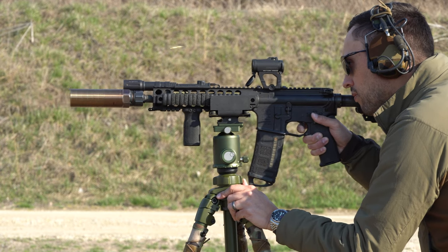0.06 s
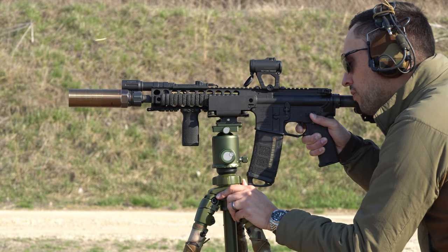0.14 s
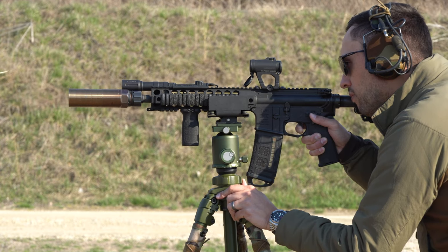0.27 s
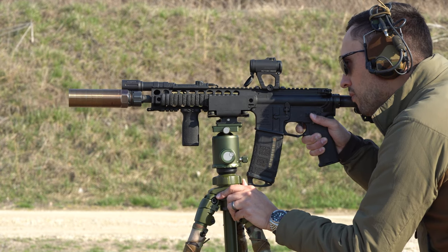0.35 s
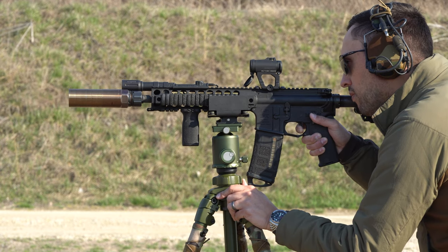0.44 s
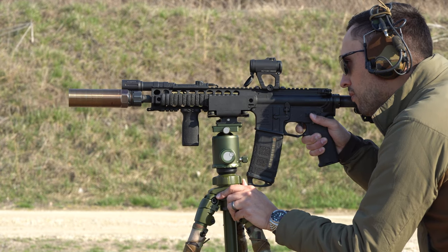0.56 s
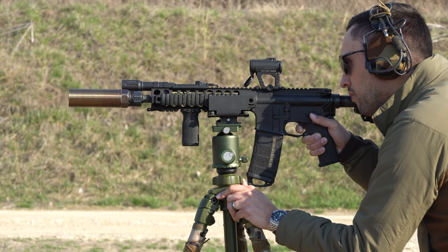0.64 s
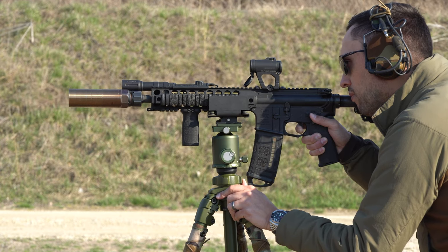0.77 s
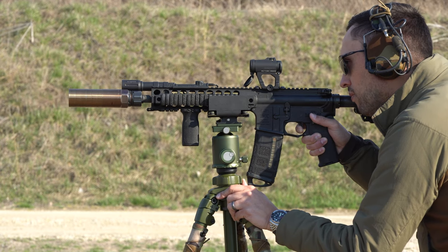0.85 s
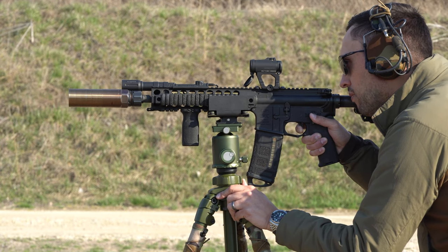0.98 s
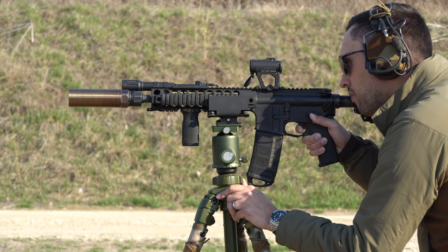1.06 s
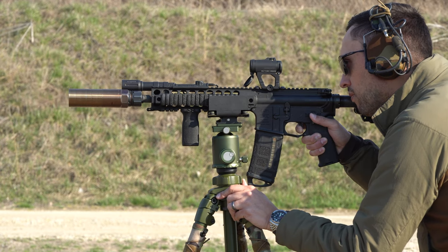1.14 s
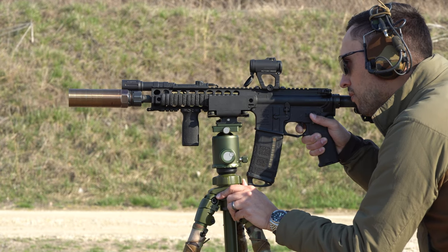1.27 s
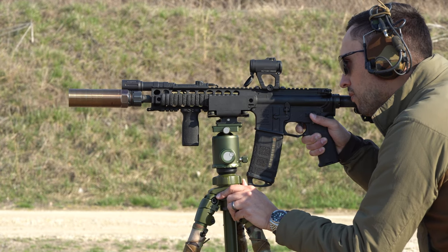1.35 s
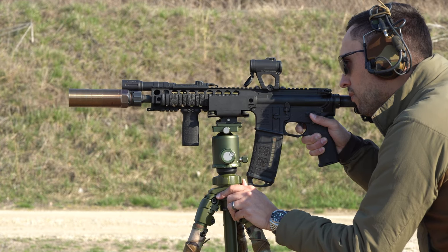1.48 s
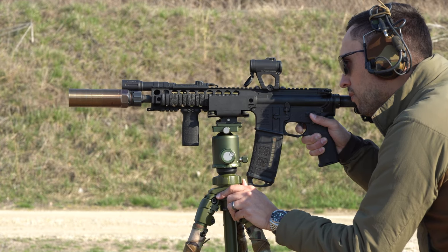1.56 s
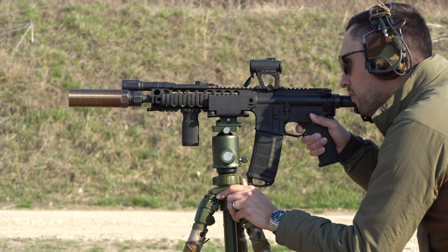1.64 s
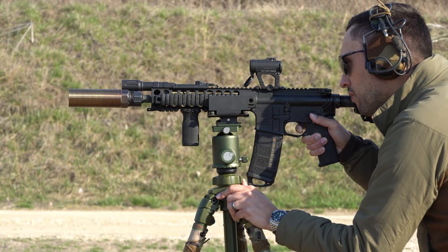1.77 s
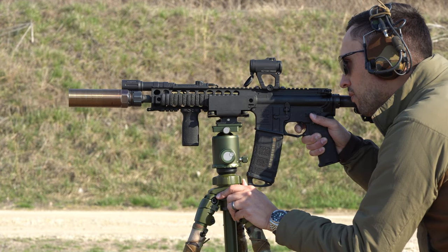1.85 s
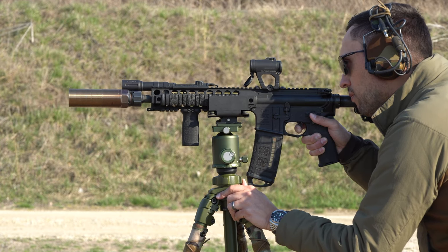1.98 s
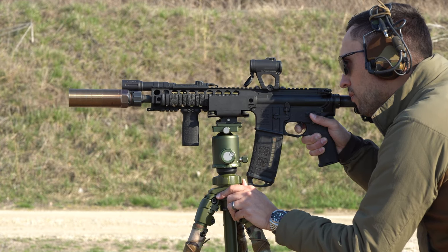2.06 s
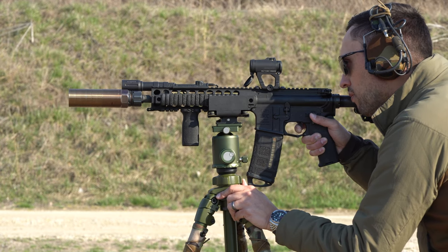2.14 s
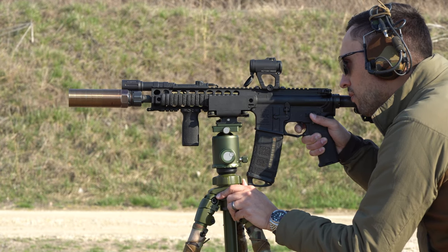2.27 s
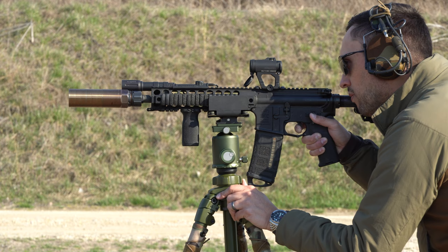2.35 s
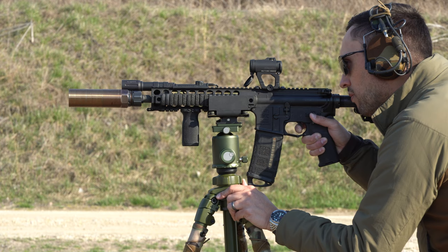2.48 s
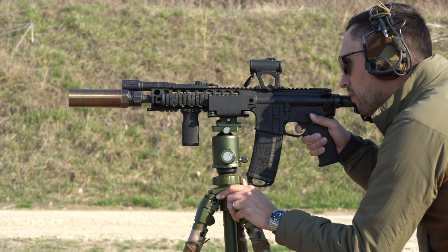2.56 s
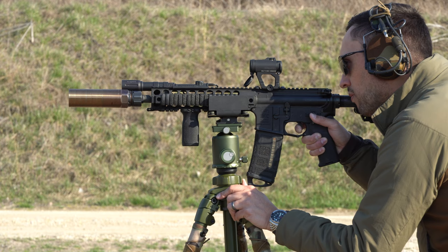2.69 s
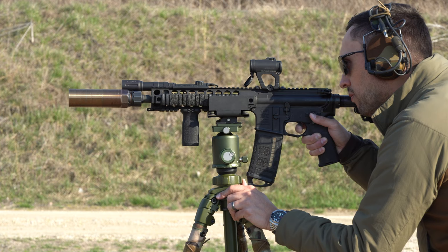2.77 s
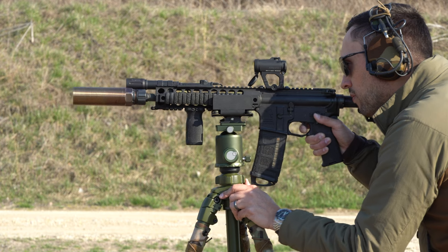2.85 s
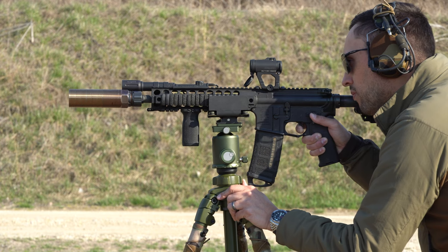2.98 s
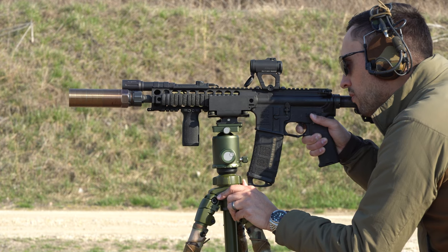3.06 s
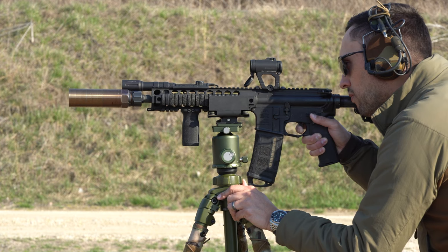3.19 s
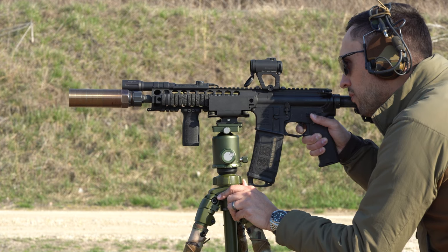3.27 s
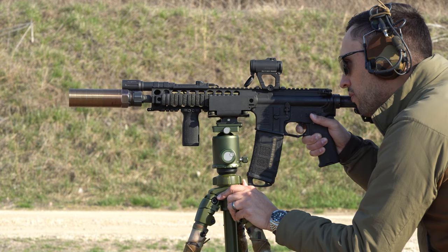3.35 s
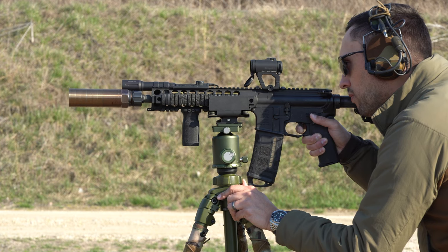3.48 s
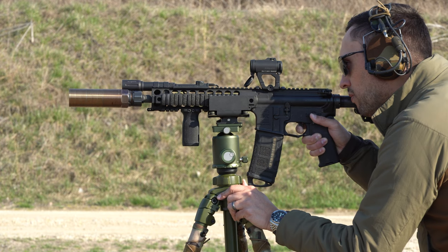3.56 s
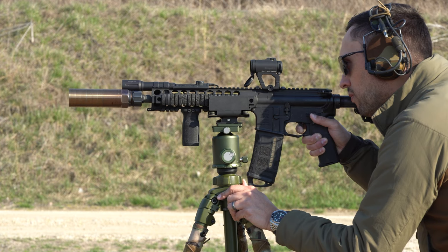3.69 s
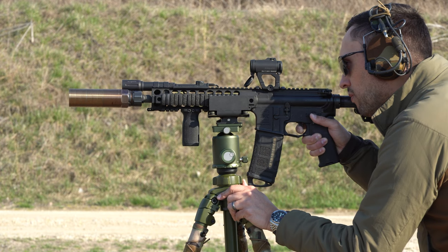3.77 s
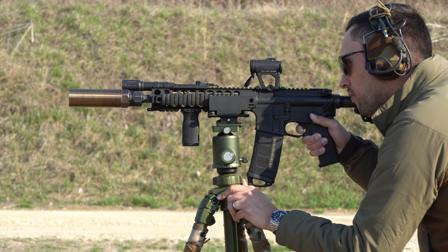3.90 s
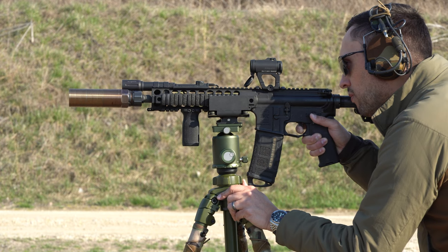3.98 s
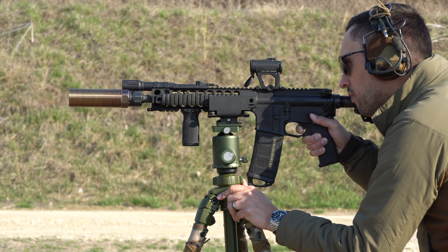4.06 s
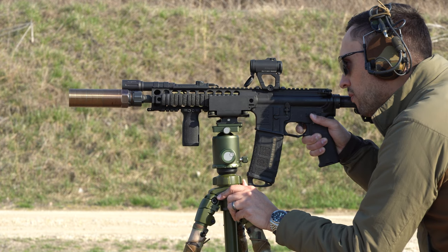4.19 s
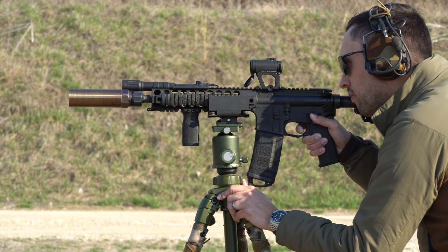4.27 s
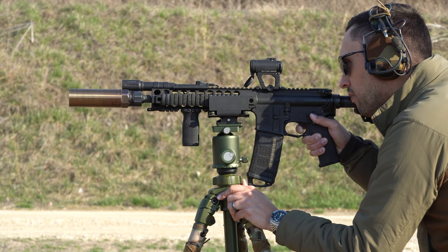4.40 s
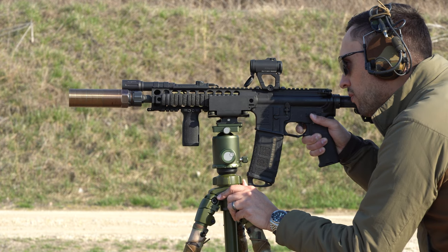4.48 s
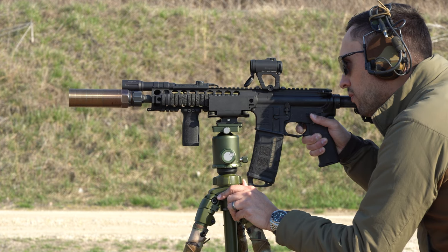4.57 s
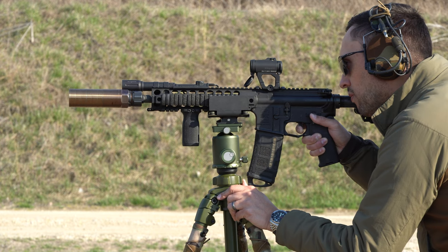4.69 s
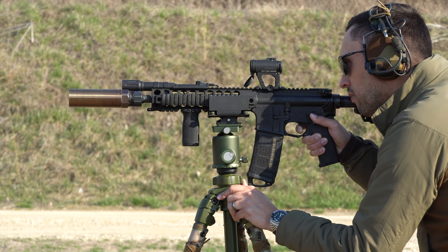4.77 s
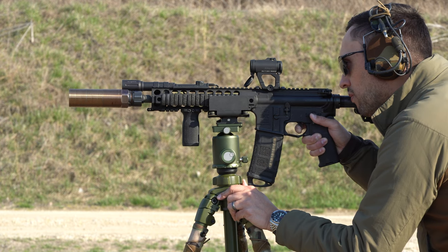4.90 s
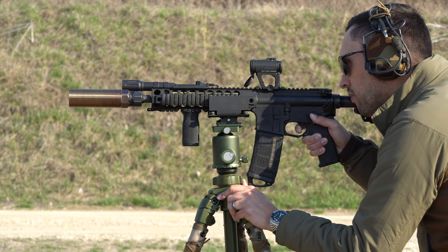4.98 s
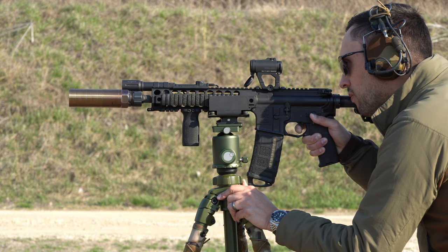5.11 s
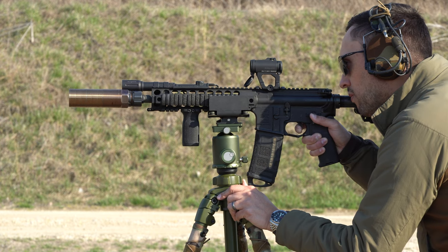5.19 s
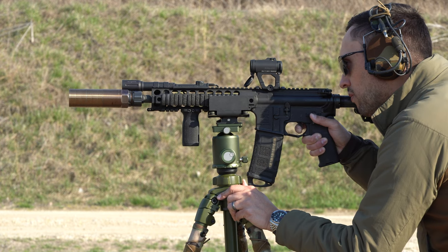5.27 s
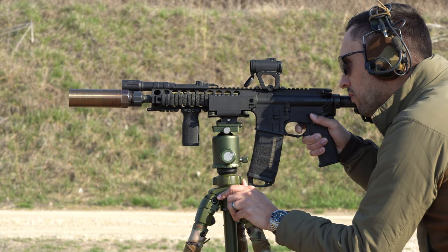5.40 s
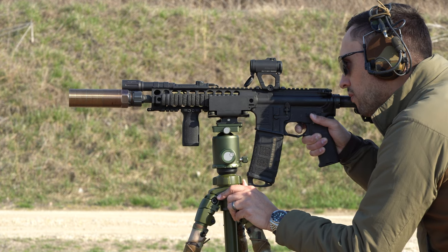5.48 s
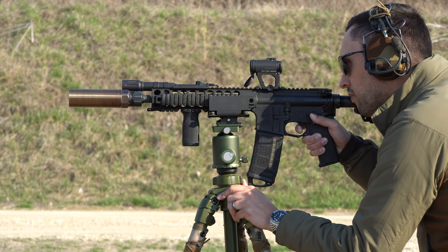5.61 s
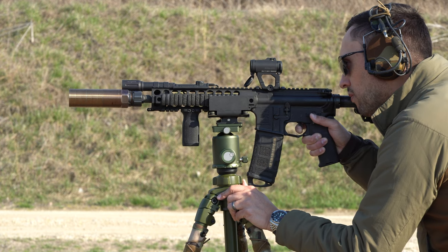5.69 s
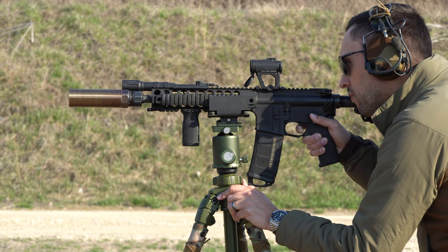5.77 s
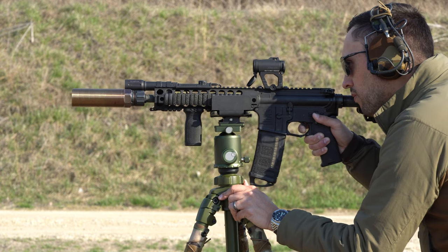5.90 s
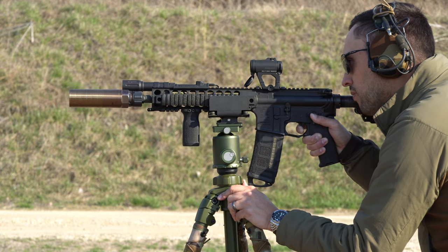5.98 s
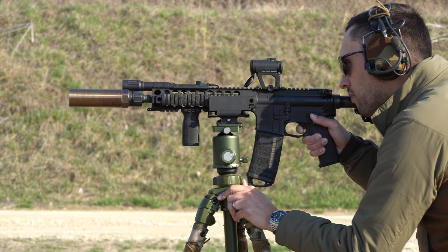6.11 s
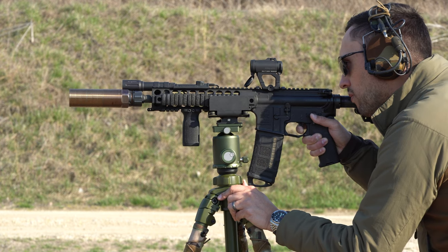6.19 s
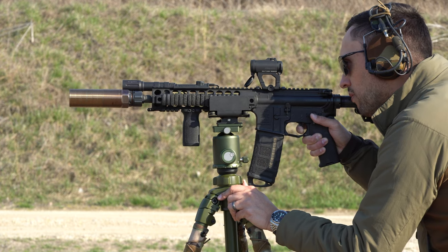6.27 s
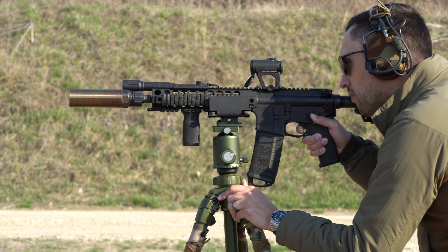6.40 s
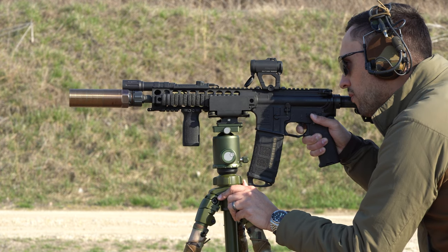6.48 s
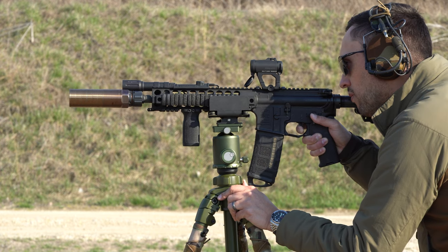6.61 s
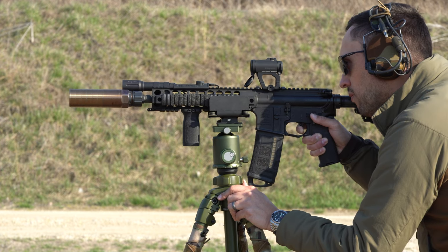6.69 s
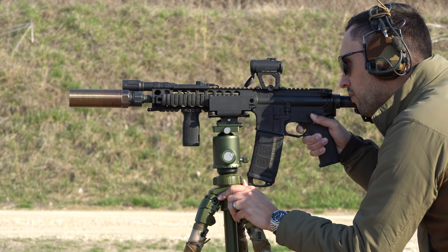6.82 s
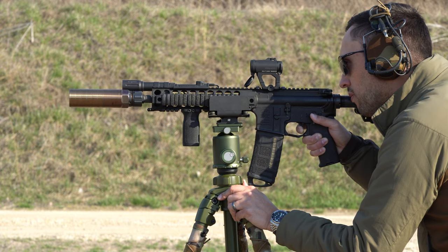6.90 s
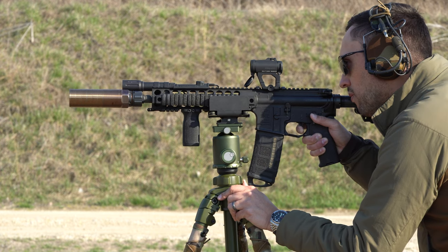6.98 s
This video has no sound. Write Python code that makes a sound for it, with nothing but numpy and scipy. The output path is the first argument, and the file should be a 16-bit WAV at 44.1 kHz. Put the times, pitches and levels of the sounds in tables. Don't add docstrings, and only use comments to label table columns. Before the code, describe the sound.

Close to the microphone at an open-air range, a suppressed rifle fires three single shots about three seconds apart. Each is a tight click, a loud dull gas thump with sharp crack, and a quick metallic bolt slam, followed by echoes slapping back from berms and trees for two seconds. A small trigger-reset tick follows the first two shots. Faint wind, far rumble and hiss lie beneath.

```python
import sys
import numpy as np
from scipy import signal
from scipy.fft import rfft, irfft
from scipy.io import wavfile
from scipy.ndimage import uniform_filter1d

SR = 44100
rng = np.random.default_rng(int(sys.argv[2]) if len(sys.argv) > 2 else 0)


def ratio(d):
    e = np.asarray(d, float) / 20
    return 10 ** e


def store_wav(level_fs):
    pcm = np.round(np.clip(np.atleast_2d(level_fs), -1, 1) * 32767)
    wavfile.write(sys.argv[1], SR, pcm.T.astype(np.int16))


N = 310905


def evened(x):
    return x / np.sqrt(np.mean(x ** 2) + 1e-20)


def read(points, hz):
    f, value = np.transpose(points)
    return np.interp(np.log(hz + 1), np.log(f + 1), value)


def add(mix, s, sound):
    part = mix[round(s * SR):][:len(sound)]
    part += sound[:len(part)]


def humps(rows, t):
    return sum(db * np.exp(-0.5 * ((t - s) / half_s) ** 2) for s, db, half_s in rows)


def coloured(points, size):
    spectrum = rfft(rng.standard_normal(size))
    level_db = read(points, np.fft.rfftfreq(size, 1 / SR))
    return evened(irfft(spectrum * ratio(level_db), size))


def fuzzy(hz, width_hz, size):
    f = np.fft.rfftfreq(size, 1 / SR)
    resonance = 1 / (1 + (2 * (f - hz) / width_hz) ** 2)
    return evened(irfft(rfft(rng.standard_normal(size)) * resonance, size))


def fading(t60, rise, size):
    t = np.arange(size) / SR
    return (1 - np.exp(-t / rise)) * ratio(-60 * t / t60)


def ring(hz, db, t60, rise, size=8000):
    return ratio(db) * np.sin(2 * np.pi * hz * np.arange(size) / SR) * fading(t60, rise, size)


# time_s, gust_db
WIND_GUSTS = [(0, 5.5), (.8, -0.5), (1.7, -2), (2.1, -0.5), (2.6, .6), (3.4, 1.5), (4.4, -0.1), (5.6, -2),
              (7.05, 3)]
# centre_s, rise_db, half_length_s
DRONE_SWELLS = [
    (1.3, 4, .4),
    (2.1, 8, 0.19),
    (3.4, 4.5, .3),
    (3.8, 9, 0.11),
    (5.85, 6, 0.22),
]
# centre_s, rise_db, half_length_s
HUM_SWELLS = [
    (1.0, -8, .35),
    (2.05, 0.5, 0.13),
    (2.55, -3, 0.19),
    (3.8, -4, .2),
    (5.0, 1, 0.27),
    (5.85, 3, 0.16),
]
# frequency_hz, level_db (per Hz)
WIND_COLOUR = [(15, -9.5), (30, 0.5), (58, -0.7), (90, -4), (130, -11), (250, -32.5), (600, -59)]
# frequency_hz, level_db (per Hz)
DRONE_COLOUR = [(70, -38), (120, -4.5), (160, 0.5), (210, -0.6), (270, -8), (330, -18.5), (600, -40.5),
                (1500, -69)]
# frequency_hz, level_db (per Hz)
HUM_COLOUR = [(200, -40), (320, -10.5), (385, -3.5), (450, -11.5), (560, -17.5), (800, -25.5), (1500, -33),
              (3000, -50.5)]
# frequency_hz, level_db (per Hz)
HISS_COLOUR = [(530, -32.5), (900, -2.5), (2660, -3.5), (3830, -2), (11200, -4), (12500, -1),
               (13400, -10.5), (16500, -16)]


def outdoors():
    wind_db, drone_db, hum_db, hiss_db, patch_db = -70.5, -74.5, -79, -86.5, 1.7
    now = np.arange(N) / SR
    wind = ratio(wind_db + np.interp(now, *np.transpose(WIND_GUSTS))) * coloured(WIND_COLOUR, N)
    drone = ratio(drone_db + humps(DRONE_SWELLS, now)) * coloured(DRONE_COLOUR, N)
    hum = ratio(hum_db + humps(HUM_SWELLS, now)) * coloured(HUM_COLOUR, N)
    hz, t, z = signal.stft(wind + drone + hum, SR, nperseg=2048)
    patches = uniform_filter1d(rng.standard_normal(z.shape), 3, axis=0)
    patches = evened(uniform_filter1d(patches, 6, axis=1))
    drifting = signal.istft(z * ratio(patch_db * patches), SR, nperseg=2048)[1][:N]
    return drifting + ratio(hiss_db) * coloured(HISS_COLOUR, N)


# start_s, level_db, pitch_hz, width_hz, t60_s
KNOCKS = [
    (5.248, -68, 1400, 2596, 0.017),
    (5.67, -67, 785, 119.7, .044),
    (5.669, -71.5, 1220, 150, 0.034),
    (5.672, -77.5, 2200, 1500, .03),
    (6.596, -75, 8100, 6000, 0.036),
]


def knocks():
    out = np.zeros(N)
    for s, db, hz, width_hz, t60 in KNOCKS:
        add(out, s, ratio(db) * fuzzy(hz, width_hz, 3000) * fading(t60, 0.00088, 3000))
    return out


# start_s, level_db, spring_ring_db
RESETS = [
    (1.9331, -29, -56.5),
    (4.8962, -31, -85),
]
# pitch_hz, level_db, t60_s
SEAR_MODES = [(770, -24.5, 0.039), (1220, -14.5, 0.023), (1965, -2.5, 0.013), (2696, 3.5, 0.021),
              (3070, -2, 0.024), (3590, -4.5, 0.018), (3920, 9, 0.015), (4700, -2, 0.02),
              (5440, -10.5, 0.022)]
# delay_s, level_db
SEAR_ECHOES = [
    (.083, -37),
    (0.111, -36),
]


def trigger():
    out = np.zeros(N)
    size = 9000
    for s, db, spring_db in RESETS:
        body = sum(ratio(d) * fuzzy(hz, 270, size) * fading(t60, 0.0031, size) for hz, d, t60 in SEAR_MODES)
        snap = ratio(-8.5) * fuzzy(6200, 15000, size) * fading(0.027, 0.0042, size)
        rattle = ratio(-7.5) * fuzzy(1800, 1700, size) * fading(0.058, 0.0034, size)
        grass = ratio(-43) * fuzzy(1600, 3000, size) * fading(0.29, 0.027, size)
        add(out, s, ratio(db) * (body + snap + rattle + grass))
        add(out, s + 0.006, ring(7650, spring_db, 0.075, 0.008))
        for delay, echo_db in SEAR_ECHOES:
            echo = fuzzy(3000, 2600, 900) * fading(0.03, 0.003, 900)
            add(out, s + delay, ratio(db + echo_db) * echo)
    return out


# delay_s, rise_db, half_depth_s
BUSHES = [
    (.045, 10, 0.01),
    (.128, 15.5, 0.025),
    (.2, 6, 0.043),
    (.384, 10.5, 0.012),
    (.5, 4, .08),
]
# frequency_hz, level_db (per Hz)
LEAF_COLOUR = [(3500, -23.5), (5200, -1.5), (6500, -0.4), (8500, -2), (11000, -4.5), (13000, -10),
               (16000, -17.5)]


def leaves():
    start_db, fade_db_per_s = -64.5, -44
    t = np.arange(SR) / SR
    level = ratio(start_db + fade_db_per_s * t + humps(BUSHES, t)) * np.clip(t / 0.053, 0, 1)
    hiss = coloured(LEAF_COLOUR, SR)
    top = ratio(-2.5 - 60 * t) * fuzzy(13500, 4000, SR)
    return level * (hiss + top)


# frequency_hz, loss_db_per_s (of travel)
AIR_LOSS = [(1200, 0.33), (2000, 2.5), (3000, 8.5), (4500, 27), (6500, 49), (9000, 75), (12000, 100),
            (16000, 150)]
# delay_s, level_db
SLAPS = [
    (0.227, -43.5),
    (.322, -46.5),
    (.472, -45.5),
    (0.549, -35),
    (.605, -47),
    (.682, -63),
    (.793, -51.5),
    (0.988, -48),
    (1.245, -48.5),
    (1.379, -55),
]


def slaps():
    pitch_hz, width_hz, octaves_per_s = 1820, 3300, -0.38
    size, lead = 512, 64
    out = np.zeros(2 * SR)
    hz = np.fft.rfftfreq(size, 1 / SR)
    for delay, db in SLAPS:
        far = 2 ** (octaves_per_s * delay)
        burst = fuzzy(pitch_hz * far, width_hz * far, size) * fading(0.018, 0.0014, size)
        burst = irfft(rfft(np.roll(burst, lead)) * ratio(-delay * read(AIR_LOSS, hz)))
        add(out, delay - lead / SR, ratio(db - 9) * evened(burst))
    return out


# delay_s, rise_db, half_depth_s
BELTS = [
    (.36, 5.5, 0.027),
    (.555, 8.5, 0.096),
    (.76, 4, 0.141),
    (1.27, 5, 0.075),
    (1.66, 1, 0.049),
]
# delay_s, level_db (at 1.2 kHz), spread_ms, brightness_db (leafy up, solid down)
FACES = [(0.114, -49, 4.3, -6), (0.13, -44.5, 20, 5.5), (0.296, -76, 4.9, 26), (0.324, -56.5, 2.6, 0),
         (0.374, -61, 12, 18), (0.399, -46.5, 13, -2.5), (0.443, -54.5, 8.4, 7.5), (0.473, -58, 3.4, -12),
         (0.517, -47, 15.6, -1.5), (0.539, -47, 3.1, -9), (0.607, -52.5, 5.5, 5.5), (0.645, -64, 4, 10),
         (0.683, -55, 2, 8), (0.708, -51, 6.1, 2.5), (0.736, -55.5, 5.9, 7.5), (0.805, -49.5, 24.6, 1),
         (0.834, -54, 3.1, 5), (0.928, -59.5, 4.6, 8), (0.991, -53, 11.6, 2), (1.214, -58, 8.2, 0.5),
         (1.25, -56.5, 7, 1), (1.281, -59, 8.3, -1), (1.383, -59.5, 5.4, -2.5), (1.405, -61, 2.6, -3),
         (1.429, -63.5, 3.1, -3), (1.555, -70.5, 12, -4.5), (1.645, -68, 3.1, -5), (1.785, -68, 10.5, -2),
         (1.847, -85, 6.1, 5)]
# frequency_hz, level_db
RETURN_COLOUR = [(30, -19), (70, -3), (130, 5.5), (400, 3), (1200, 0.9), (2200, -2), (3400, -8),
                 (4600, -6.5), (6300, -17.5), (10000, -25.5), (16000, -34.5)]


def range_shape(hz, t):
    octave = np.log2(hz[:, None] + 1)

    def above(lo, hi):
        return np.clip((octave - np.log2(lo)) / np.log2(hi / lo), 0, 1)

    boom, bass, treble = 1 - above(150, 330), 1 - above(450, 900), above(1400, 3200)
    deepest = 1 - above(230, 480)

    db = -57 - 11.5 * t + 11 * np.exp(-0.5 * (t / 0.13) ** 2) + humps(BELTS, t)
    db = db - 44.5 * np.maximum(t - 2, 0)
    colour_db = boom * (1.5 - 16 * t) + (bass - boom) * (0.6 - 7.5 * t) + treble * (10 - 8.5 * t)
    power = ratio(db + colour_db) ** 2

    for delay, face_db, spread_ms, bright_db in FACES:
        spread_s = spread_ms / 1000 * np.where(t < delay, 0.55, 1.2)
        bump = np.exp(-0.5 * ((t - delay) / spread_s) ** 2)
        colour_db = bass * (-4.5 - 1.536 * delay - 1.6 * bright_db)
        colour_db = colour_db + treble * (4.4 - 9.5 * delay + bright_db)
        small_db = -35 * deepest
        power += bump * ratio(face_db + colour_db + small_db) ** 2

    air_db = -t * read(AIR_LOSS, hz)[:, None]
    band_to_white_db = 10 * np.log10(SR / 2 / 1100)
    path_db = read(RETURN_COLOUR, hz)[:, None] + air_db + band_to_white_db
    return np.sqrt(power) * ratio(path_db) * np.clip(t / 0.045, 0, 1)


# start_s, charge_db, crack_db, hammer_db, bolt_db
SHOTS = [
    (0.0372, -1.94, -0.44, -36, -23),
    (2.888, -1.92, 0.93, -39, -21.5),
    (5.8875, -1.45, -0.7, -30.5, -22),
]
# frequency_hz, likeness (0-1)
LIKENESS = [(200, .93), (450, .9), (1000, .5), (2500, .33), (6000, .1)]
# delay_s, pitch_hz, level_db, t60_s
BERMS = [(.1078, 240, -30.5, .08), (.1082, 440, -31, .05), (.126, 122, -34.5, .06), (.398, 378, -37, .09),
         (.4095, 300, -40, .04), (.16, 200, -43, .05), (.235, 160, -46, .05), (.318, 500, -44, .03),
         (.414, 125, -41, .06), (.475, 150, -46, .05), (.522, 140, -46, .05), (.828, 480, -55, .04),
         (.987, 500, -57, .03)]


def echoes():
    grain_db = 1.45
    noise = rng.standard_normal((1 + len(SHOTS), 3 * SR))
    hz, t, z = signal.stft(noise, SR, nperseg=256, noverlap=208)
    alike = np.clip(read(LIKENESS, hz), 0, 1)[:, None]
    z = alike * z[0] + np.sqrt(1 - alike ** 2) * z[1:]
    z = z * range_shape(hz, t)
    grain = uniform_filter1d(rng.standard_normal(z.shape[1:]), size=3, axis=1)
    grain = evened(uniform_filter1d(grain, size=9, axis=0))
    z = z * ratio(grain_db * grain - grain_db ** 2 * np.log(10) / 20)
    tails = signal.istft(z, SR, nperseg=256, noverlap=208)[1]
    for delay, berm_hz, db, t60 in BERMS:
        add(tails.T, delay, -ring(berm_hz, db, t60, 0.00031)[:, None])
    return tails


# pitch_hz, level_db, t60_s
GAS_MODES = [(359, -1, 0.027), (456, -12, 0.02), (695, -7, 0.033), (828, -13, 0.014), (1074, -13, 0.04),
             (2560, -13, 0.01), (3850, -9, 0.011)]
# pitch_hz, width_hz, level_db, t60_s
STEEL_MODES = [(1540, 300, -12, 0.032), (1773, 83, -17, 0.033), (2500, 640, -12, 0.048),
               (2996, 86, -14.5, 0.034), (3596, 160, -12, 0.04), (4160, 900, -8, 0.021),
               (6000, 500, -16, 0.016), (9240, 7400, -14.5, 0.021), (13070, 7300, -19, 0.022)]
# frequency_hz, level_db (per Hz)
CLATTER_COLOUR = [(180, -39), (300, -6), (1430, -5.5), (2320, -8), (3460, -6.5), (5160, -12.5),
                  (8360, -20.5), (12300, -18.5), (16000, -24)]


def blast(charge_db, crack_db):
    size = 8000
    thump = np.zeros(size)
    for hz, db, t60 in GAS_MODES:
        detune = 1 + 0.018 * rng.uniform(-0.79, 1)
        thump += ring(hz * detune, db, t60, 0.00058)
    suction = -ring(108, -19, 0.05, 0.0013) - ring(68, -21.5, 0.079, 0.00085)
    add(thump, 0.0012, suction)
    crack = np.zeros(size)
    for hz, width_hz, db, t60 in STEEL_MODES:
        crack += ratio(db) * fuzzy(hz, width_hz, size) * fading(t60, 0.00049, size)
    crack += ratio(-11.5) * fuzzy(5900, 12000, size) * fading(0.033, 0.00083, size)
    clatter = ratio(-14) * coloured(CLATTER_COLOUR, size) * fading(0.1, 0.00037, size)
    return ratio(charge_db) * (thump + clatter) + ratio(crack_db) * crack


# frequency_hz, level_db (per Hz)
HAMMER_COLOUR = [(400, -29.5), (900, -12.5), (3500, -1), (5200, -8), (7000, -14.5), (12500, -13.5),
                 (16000, -26.5)]
# frequency_hz, level_db (per Hz)
BOLT_COLOUR = [(120, -45), (200, -19.5), (2290, -6), (2960, -4.5), (4770, -11.5), (5330, -14.5),
               (11700, -23.5), (12600, -18.5), (16000, -35)]


def rifle():
    hammer_lead_s, bolt_s, feed_lead_s = 0.0085, 0.0417, 0.011
    out = np.zeros(N)
    for (s, charge_db, crack_db, hammer_db, bolt_db), tail in zip(SHOTS, echoes()):
        hammer = ratio(hammer_db) * coloured(HAMMER_COLOUR, 2000) * fading(0.02, 0.001, 2000)
        add(out, s - hammer_lead_s, hammer)
        add(out, s, blast(charge_db, crack_db))
        bolt = ratio(bolt_db) * coloured(BOLT_COLOUR, 4000) * fading(0.034, 0.00039, 4000)
        add(out, s + bolt_s, bolt)
        feed = ratio(-29) * fuzzy(2400, 900, 2000) * fading(0.023, 0.0013, 2000)
        add(out, s + bolt_s - feed_lead_s, feed)
        for answer in (tail, leaves(), slaps()):
            add(out, s, ratio(charge_db) * answer)
    return out


def scene():
    return (rifle() + trigger() + knocks() + outdoors())[None]


def low_pass(x):
    return signal.sosfilt(signal.butter(12, 16950, fs=SR, output="sos"), x)


def record(dry):
    ceiling, edge_hz = 0.93, 16150
    thin = signal.lfilter(*signal.butter(2, 38, "high", fs=SR), dry)
    soft = ceiling * thin / (ceiling ** 4 + thin ** 4) ** 0.25
    lowpass = signal.firwin(255, edge_hz, window=("kaiser", 9), fs=SR)
    limited = signal.oaconvolve(soft, lowpass[None], "same")
    return low_pass(limited)


dry = scene()
out = record(dry)
store_wav(out)
```